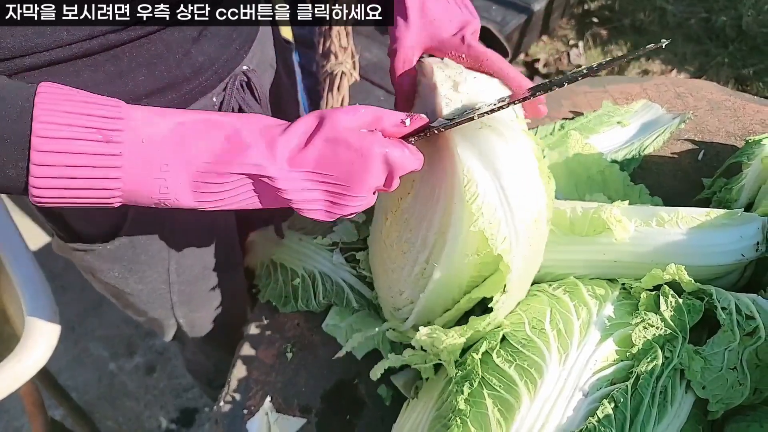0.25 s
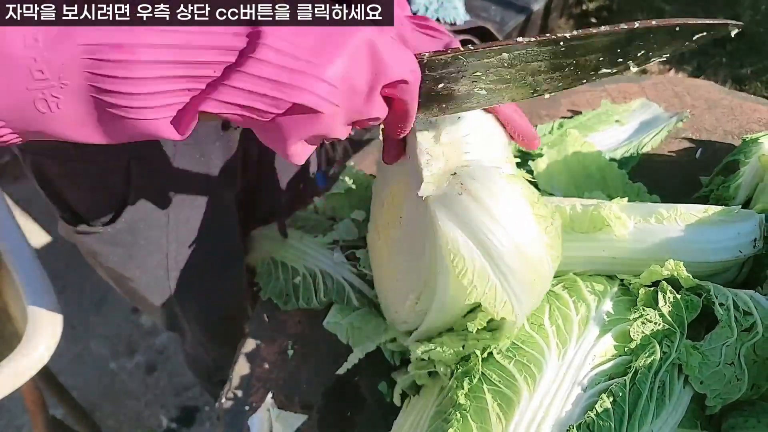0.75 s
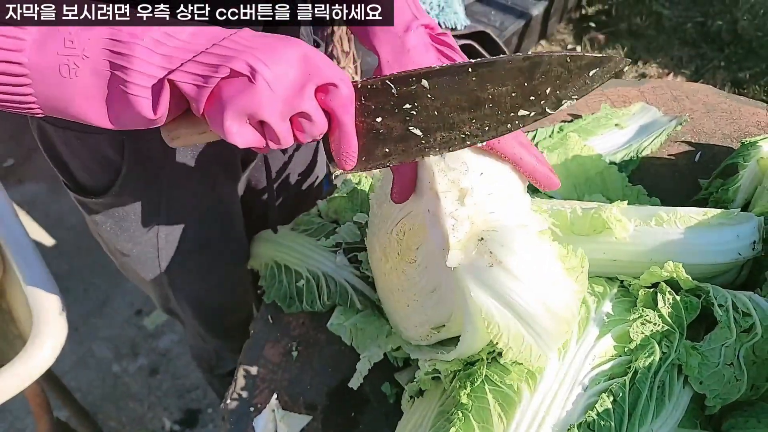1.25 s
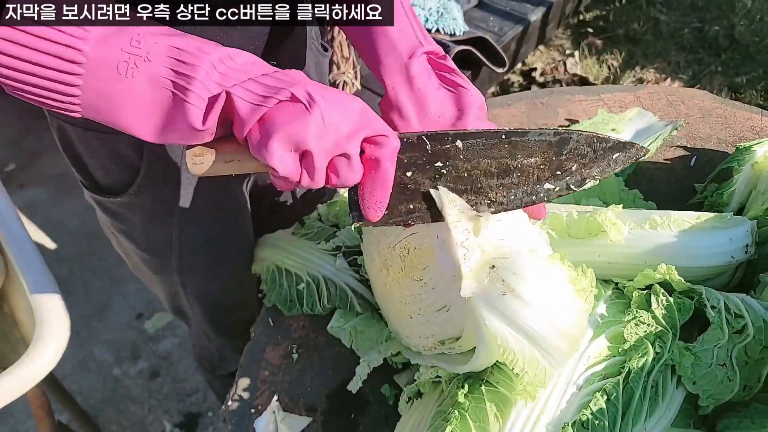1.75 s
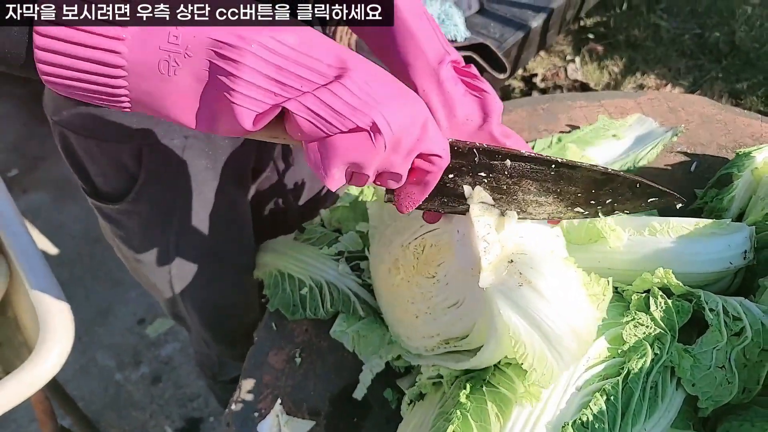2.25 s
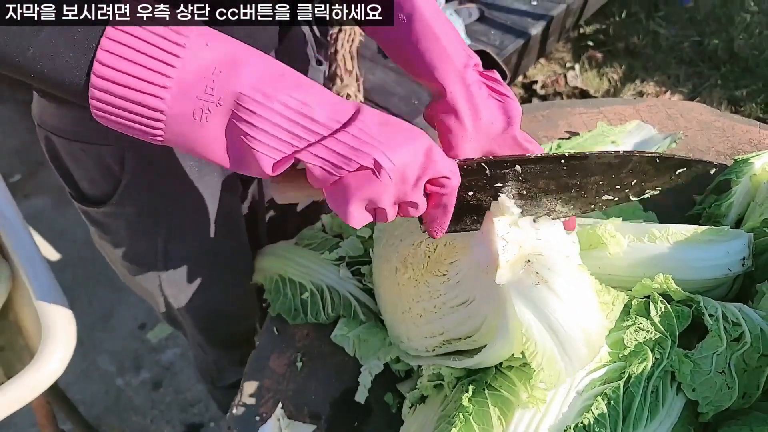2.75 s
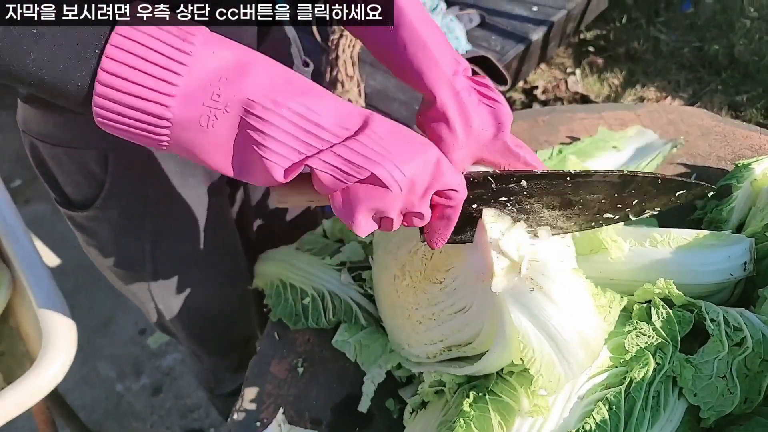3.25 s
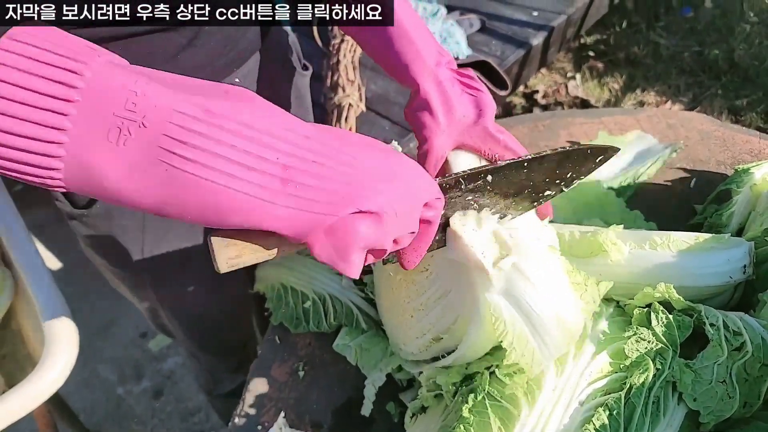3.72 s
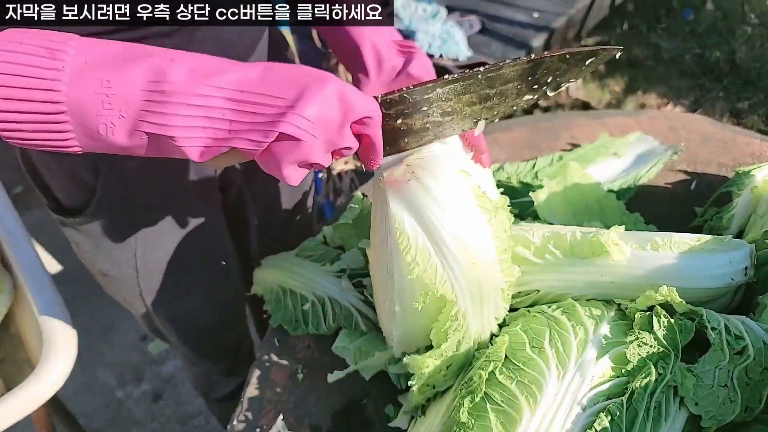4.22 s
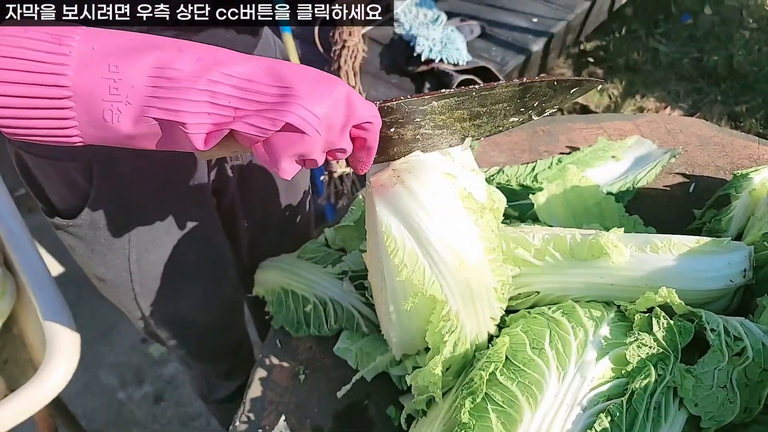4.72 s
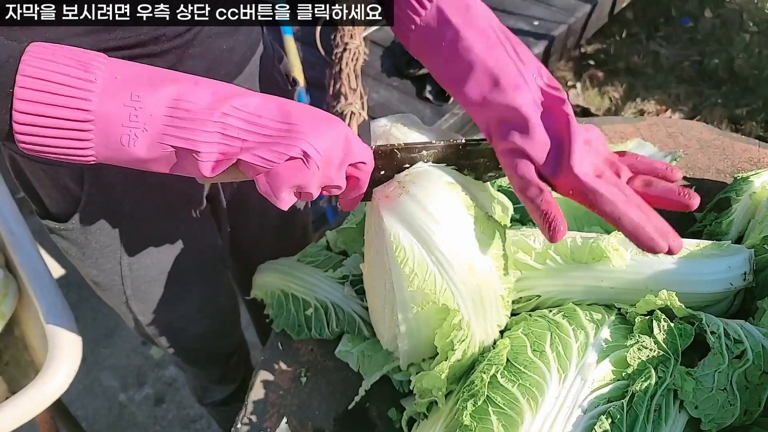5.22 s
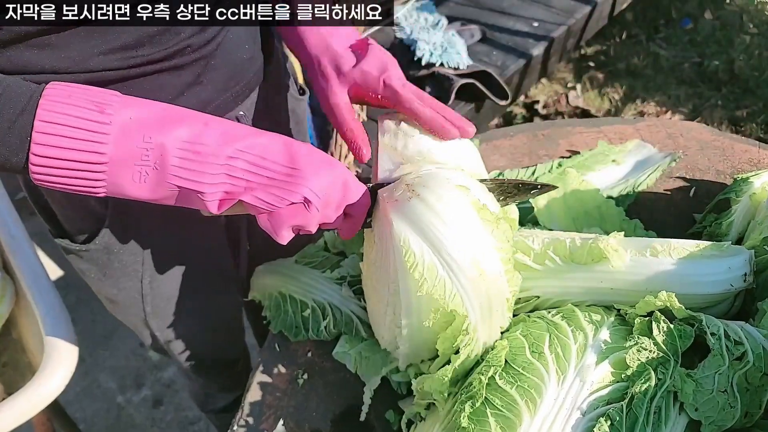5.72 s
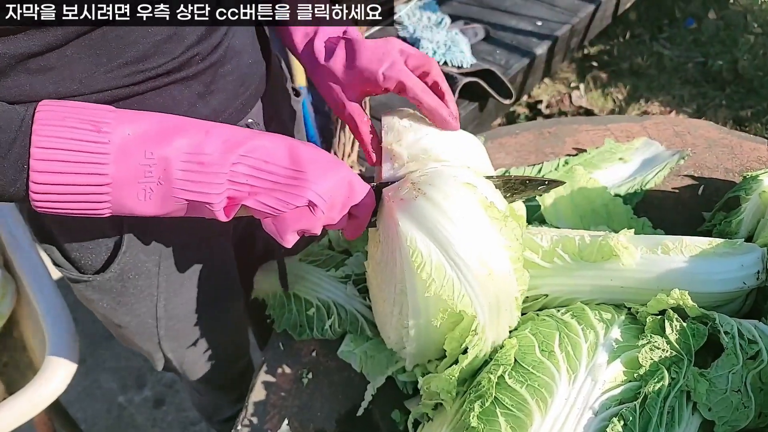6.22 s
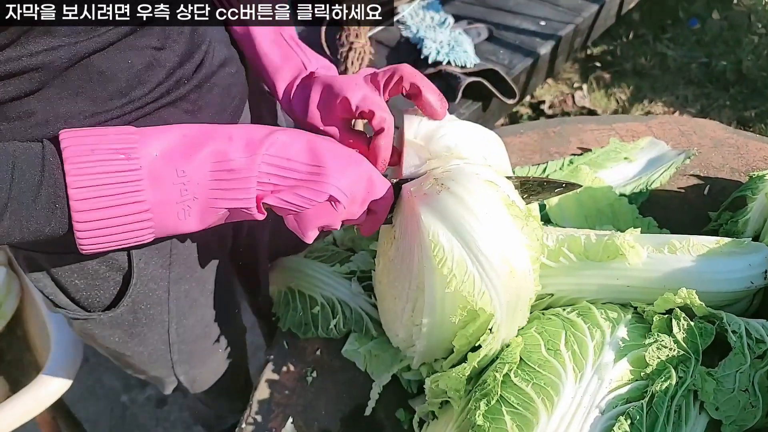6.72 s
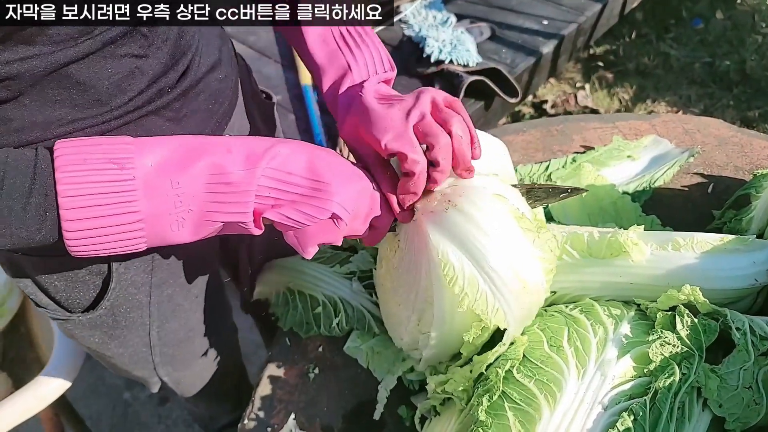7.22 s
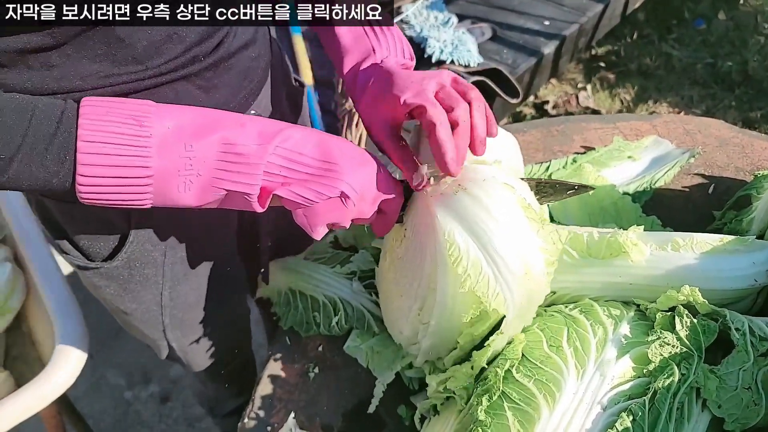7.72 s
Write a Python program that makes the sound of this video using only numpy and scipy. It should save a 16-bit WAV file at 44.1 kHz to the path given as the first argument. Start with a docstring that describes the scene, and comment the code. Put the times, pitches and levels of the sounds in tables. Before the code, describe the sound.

Sharp vegetable snaps and juicy crunching as a blade works through cabbage, with dull tub thumps, low wind buffeting and a faint distant bird.

```python
"""Cutting a cabbage outdoors

Close by, a knife works through a crisp head: ribs snap, leaf cells crunch under blade and gloves,
damp pops slip between them, and dull blows thump the tub below, one of them heavy.
Gusts buffet the microphone; a faint hiss and a small whistling bird sit far behind.
Tissue, wind and hiss are shaped noise; tub, head and pops ring as resonances; the bird is gliding sines."""
import sys
import numpy as np
from scipy import signal
from scipy.fft import rfft, irfft
from scipy.io import wavfile
from scipy.ndimage import uniform_filter1d

SR = 44100
rng = np.random.default_rng(int(sys.argv[2]) if len(sys.argv) > 2 else 0)


def dump_mix(stems):
    """Bounce the given channels to the path in sys.argv[1] as a 16-bit WAV at rate SR."""
    frames = np.atleast_2d(stems).T  # one column per channel
    limited = np.clip(frames, -1, 1)  # hard clip at full scale
    pcm = np.round(limited * 32767).astype(np.int16)
    wavfile.write(sys.argv[1], SR, pcm)


N = 351168


def from_db(db):
    """Amplitude ratio of a level in dB."""
    return 10 ** (np.asarray(db) / 20)


def rms_one(x):
    """Scale a signal to rms 1."""
    return x / np.sqrt(np.mean(x ** 2) + 1e-20)


def in_time(rows):
    """Draw straight lines between the rows; the first column is time in seconds."""
    s, *columns = np.transpose(rows)
    return [np.interp(np.arange(N) / SR, s, column) for column in columns]


def drift(rate_hz):
    """Slow chance: noise through a double one-pole low-pass, spread 1."""
    r = np.exp(-2 * np.pi * rate_hz / SR)
    noise = rng.standard_normal(N + SR)
    return rms_one(signal.lfilter([1], [1, -2 * r, r * r], noise)[SR:])   # settled after a second


def coloured(x, spectrum):
    """Causal (minimum-phase) filter with the given spectrum; white of rms 1 stays at rms 1."""
    hz, db = np.transpose(spectrum)
    grid = np.fft.rfftfreq(8192, 1 / SR)
    cepstrum = irfft(np.log(from_db(np.interp(np.log(grid + 1), np.log(hz), db))))
    # folding the cepstrum onto positive time makes the phase minimal
    cepstrum[1:4096] *= 2
    cepstrum[4097:] = 0
    kernel = irfft(np.exp(rfft(cepstrum)))
    return signal.fftconvolve(x, kernel / np.sqrt(np.sum(kernel ** 2)))[:len(x)]


def resonance(x, hz, width_hz):
    """A damped mode that passes a band around its own pitch."""
    r = np.exp(-np.pi * width_hz / SR)
    gain = (1 - r * r) / 2
    return signal.lfilter([gain, 0, -gain], [1, -2 * r * np.cos(2 * np.pi * hz / SR), r * r], x + 1e-18)


def burst(age, t60):
    """Envelope that dies away by 60 dB in t60."""
    return from_db(-60 * age / t60)


def ring(clicks, hz, t60):
    """A unit click sets a sine of height 1 ringing."""
    r, w = from_db(-60 / (t60 * SR)), 2 * np.pi * hz / SR
    return signal.lfilter([0, np.sin(w)], [1, -2 * r * np.cos(w), r * r], clicks + 1e-18)


def puffs(per_s, spread_db, hold):
    """Clicks of uneven size in clumps, each shrinking by the factor hold per sample; rms 1."""
    sizes = from_db(spread_db * np.minimum(rng.exponential(1, N), 4.5))
    born = rng.random(N) < per_s * from_db(3.0 * drift(45)) / SR
    return rms_one(signal.lfilter([1], [1, -hold], born * sizes))


EDGE_DB, ROUNDNESS = 22.5, 0.87   # a rise or fall spans EDGE_DB; ROUNDNESS bends its slope


def swells(rows, bed):
    """Each row (peak s, rise s, hold s, fall s, dB, second dB) swells over a bed of two levels; powers add."""
    t = np.arange(N // 32 + 2) * 32 / SR   # every 32nd sample is enough
    power = 0
    for s, rise, hold, fall, level_db, second_db in rows:
        away = np.maximum((s - t) / rise, 0) + np.maximum((t - s - hold) / fall, 0)
        levels_db = level_db + np.array([[0], [second_db]])   # the second is relative to the first
        power = power + from_db(levels_db - EDGE_DB * away ** ROUNDNESS) ** 2
    return [np.sqrt(np.interp(np.arange(N) / SR, t, p) + from_db(db) ** 2) for p, db in zip(power, bed)]


# Hiss far behind the cabbage. Each row: frequency in Hz, relative level in dB per Hz.
HISS_COLOUR = [(59, 18), (100, 11), (304, -23), (1030, -18), (2120, 22), (2990, -32), (7170, 4), (7980, -9),
               (11000, -39), (12500, -47), (15500, -60), (16500, -81)]
HISS_DB = -74


def far_hiss():
    """Steady coloured noise whose level drifts slightly."""
    return from_db(HISS_DB + 0.74 * drift(2.1)) * coloured(rng.standard_normal(N), HISS_COLOUR)


POP_PER_S, POP_CYCLES = 160, 23   # mean rate before clumping; cycles until 60 dB down


def small_pops():
    """Random clumped pops that ring a few cycles, pitches spread over two octaves; rms 1."""
    sizes = from_db(5.2 * np.minimum(rng.exponential(1, N), 4)) * rng.choice([-1, 1], N)
    born = rng.random(N) < POP_PER_S * from_db(5.0 * drift(15)) / SR
    dealt = rng.integers(0, 12, N)   # which of twelve pitches each pop takes
    pitches = np.geomspace(650, 3200, num=12)
    return rms_one(sum(ring(sizes * born * (dealt == k), hz, POP_CYCLES / hz) for k, hz in enumerate(pitches)))


# Bouts of leaf tissue tearing under blade or glove, close by. Each row: peak in seconds, rise in seconds,
# fall in seconds, fine crunch in dB, juicy low crunch in dB relative to the fine.
TEARS = [(0.0, .02, 0.13, -45, -0.5), (0.092, 0.086, 0.04, -47.5, -3), (0.157, 0.0097, 0.0098, -46.5, 3),
         (0.285, 0.16, 0.23, -42.5, -3), (0.651, 0.42, 0.5, -47.5, -18), (0.74, 0.046, 0.2, -68, 19),
         (0.858, 0.037, 0.17, -50.5, 7), (0.94, 0.008, 0.062, -45, 1.5), (1.08, 0.13, 0.13, -52.5, -0.5),
         (1.203, 0.048, 0.028, -54.5, 6.5), (1.345, 0.12, 0.033, -41, -4.5), (1.599, 0.08, 0.04, -32, -11),
         (1.748, 0.045, 0.06, -31.5, -19), (1.949, 0.44, 0.19, -44.5, 0), (2.156, 0.11, 0.25, -40, -4.5),
         (2.387, 0.058, 0.063, -37.5, -6.5), (2.518, 0.093, 0.12, -46, -27),
         (2.61, 0.0069, 0.17, -39.5, -21), (2.776, 0.16, 0.031, -45.5, -8),
         (2.868, 0.11, 0.067, -44.5, -5.5), (3.045, 0.19, 0.041, -42, -4), (3.177, 0.19, 0.11, -48.5, -7),
         (3.43, 0.05, 0.17, -38.5, -5), (3.498, 0.065, 0.2, -38, -14), (3.789, 0.15, 0.13, -46.5, 0.5),
         (3.917, 0.058, 0.016, -49, -20), (3.956, 0.011, 0.042, -46, -8), (4.201, 0.01, 0.018, -38, -6),
         (4.309, 0.079, 0.11, -44, -3.5), (4.528, 0.026, 0.11, -54.5, -1), (5.46, 0.028, 0.087, -57, 0),
         (5.659, 0.13, 0.064, -48.5, 3), (5.785, 0.052, 0.048, -49.5, 4.5),
         (5.843, 0.011, 0.023, -48.5, 6.5), (6.29, 0.041, 0.05, -51, 9.5), (6.466, 0.0072, 0.036, -39, -1),
         (6.781, 0.021, 0.067, -61, 10.5), (6.871, 0.027, 0.041, -48.5, 1), (6.952, 0.051, 0.13, -50, -3),
         (7.064, 0.13, 0.091, -51.5, 3), (7.265, 0.065, 0.052, -55.5, 6.5), (7.369, 0.054, 0.13, -45, 0),
         (7.445, 0.02, 0.087, -42.5, -5), (7.9, 0.019, 0.42, -43.5, 1.5), (7.95, 0.054, 0.078, -37, 0)]
# The blade forced through the thick stalk, a crunch that holds. Each row: start of the hold in seconds,
# hold in seconds, fall in seconds, fine crunch in dB, juicy crunch in dB relative to the fine.
CUTS = [(4.711, 0.021, 0.082, -34, 1), (5.034, 0.063, 0.034, -32, -1.5)]
# Faint rustle of leaves being handled. Each row: time in seconds, fine level in dB, juicy level in dB.
RUSTLE = [(0.0, -68, -60), (0.8, -81, -49.5), (1.1, -103, -73), (1.45, -48.5, -50), (1.7, -88, -61),
          (2.7, -62, -49.5), (2.93, -95, -67.5), (3.35, -52.5, -53.5), (4.0, -64.5, -57.5), (4.6, -79, -67),
          (4.9, -66, -58.5), (5.3, -62, -53), (5.75, -71.5, -59.5), (6.4, -65.5, -59.5), (6.7, -68.5, -54),
          (7.3, -69, -54), (7.55, -57, -50.5), (7.83, -55.5, -48.5)]
# Colour of fine crunch as the microphone hears it: the peak near 12 kHz and the dip near 8 kHz come from the
# microphone. # Shared in part by the rib cracks. Each row: frequency in Hz, relative dB per Hz.
FINE_COLOUR = [(1470, -27), (2500, 0), (3500, -8), (4800, -2), (5600, -4), (6400, -9), (7200, -6),
               (8100, -14), (10000, -9), (11300, -7), (12150, 0.5), (13200, -5), (15800, -8)]
# Colour of the wet, low crunch. Each row: frequency in Hz, relative level in dB per Hz.
JUICY_COLOUR = [(150, -55.5), (250, -11), (341, -3), (444, -1.5), (646, -6.5), (972, -3), (1320, -4.5),
                (3500, -16.5), (4550, -22.5), (7700, -120)]
CUT_RISE_S = 0.0075
CUT_DENSE = 1.3   # in a cut so many cells burst at once that they merge into a steadier hiss
SMALL_POPS_DB = -8   # relative to the juicy crunch


def crunch():
    """Big cells burst across the whole range, small ones only in their own band, over fine rubbing noise."""
    bouts = [(s, rise, 0, *rest) for s, rise, *rest in TEARS]
    bouts += [(s, CUT_RISE_S, *rest) for s, *rest in CUTS]
    fine_gain, juicy_gain = swells(bouts, in_time(RUSTLE))
    t = np.arange(N) / SR
    cutting = sum((t > s - CUT_RISE_S) & (t < s + hold + fall) for s, hold, fall, *_ in CUTS)
    thinning = 1 + CUT_DENSE * cutting
    big = puffs(220, spread_db=6.5, hold=0.995) / thinning + 0.5 * cutting
    fine = 0
    for low_hz, high_hz in [(1500, 4200), (4200, 7500), (7500, 11000), (11000, 18000)]:
        small = puffs(360, spread_db=2.5, hold=0.9)
        band = signal.butter(2, [low_hz, high_hz], "band", fs=SR, output="sos")
        fine = fine + signal.sosfilt(band, (big + 1.22 * small + 1.0) * rng.standard_normal(N))
    wet = 1.25 * puffs(220, spread_db=4.0, hold=0.94) / thinning
    juicy = (big + wet + 4.5) * rng.standard_normal(N)
    fine = rms_one(coloured(fine, FINE_COLOUR))
    juicy = rms_one(coloured(juicy, JUICY_COLOUR)) + from_db(SMALL_POPS_DB) * small_pops()
    return fine_gain * fine + juicy_gain * juicy


# Gusts on the microphone. Each row: peak in seconds, rise in seconds, fall in seconds, rumble in dB,
# flutter in dB relative to the rumble.
GUSTS = [(0.109, 0.096, 0.029, -15, -26), (0.231, 0.36, 0.0086, -31, -32),
         (0.318, 0.091, 0.015, -32.5, -32), (0.41, 0.094, 0.045, -31.5, -4.5),
         (0.485, 0.21, 0.074, -31, -19), (0.74, 0.15, 0.24, -41, -4), (0.82, 0.12, 0.19, -34.5, -12.5),
         (0.91, 0.079, 0.069, -25.5, -19), (1.091, 0.035, 0.046, -27.5, -27),
         (1.18, 0.091, 0.94, -43.5, -14.5), (1.6, 0.043, 0.16, -37.5, -1), (1.762, 0.035, 0.041, -23.5, -2),
         (1.812, 0.076, 0.019, -12.5, -19), (1.882, 0.074, 0.0091, -25, -20), (1.95, 0.045, 0.089, -37, -8),
         (2.04, 0.1, 0.27, -29, -15), (2.135, 0.078, 0.056, -18.5, -20), (2.21, 0.056, 0.12, -30, -31),
         (2.37, 0.037, 0.074, -33.5, -12.5), (2.518, 0.024, 0.025, -29, -29),
         (2.63, .05, 0.067, -41.5, -22), (2.72, 0.13, 0.061, -52.5, 9), (3.354, 0.017, 0.017, -20.5, -19.5),
         (3.415, 0.24, .05, -33, -18), (3.447, 0.0062, 0.013, -10.5, -9), (3.51, 0.11, 0.039, -18.5, -26),
         (3.58, 0.1, 0.042, -28, -30), (3.626, 0.03, 0.036, -22.5, -18), (3.78, 0.33, 0.23, -34.5, -12.5),
         (3.87, 0.067, 0.1, -33, -15), (3.965, 0.029, 0.12, -31, -14), (4.05, 0.09, 0.15, -35, -15),
         (4.382, 0.065, 0.028, -27, -33), (4.71, 0.037, 0.15, -42, -7), (4.87, 0.15, 0.32, -37.5, -33),
         (5.11, 0.15, 0.017, -31, -21), (5.29, 0.34, 0.1, -31.5, -11.5), (5.491, 0.046, 0.16, -17, -10),
         (5.826, 0.15, 0.03, -27.5, -16), (5.895, 0.11, 0.16, -24.5, -23),
         (5.988, 0.032, 0.049, -25, -19.5), (6.188, 0.08, 0.025, -33, -16), (6.83, 0.44, 0.035, -39.5, -14),
         (7.38, 0.062, 0.045, -31.5, -18), (7.47, 0.12, 0.046, -42, -4), (7.56, 0.033, 0.035, -33, -25),
         (7.67, 0.076, 0.084, -39, -17), (7.95, 0.77, .2, -37, -13.5)]
# Light breeze between the gusts. Each row: time in seconds, rumble in dB before its lumps are added.
BREEZE = [(0.0, -45), (2.8, -54.5), (2.95, -50.5), (3.22, -47.5), (3.28, -68), (4.2, -48.5), (4.6, -43),
          (4.68, -47), (6.25, -52), (6.6, -45.5), (7.2, -46.5), (7.32, -48), (7.96, -66)]
# Colour of the slow pressure swings. Each row: frequency in Hz, relative level in dB per Hz.
RUMBLE_COLOUR = [(12, -55), (25, 3), (43, 8.5), (59, 6), (91, -2), (125, -4.5), (160, -17), (210, -67.5),
                 (350, -120)]
# Colour of the faster flutter. Each row: frequency in Hz, relative level in dB per Hz.
FLUTTER_COLOUR = [(60, -28), (125, -4.5), (220, -10), (350, -18), (900, -54)]
BREEZE_FLUTTER_DB = -11.5   # relative to the breeze's rumble


def gusts():
    """Turbulence at the microphone port: slow pressure swings, with lumpy faster flutter above them."""
    breeze_db = in_time(BREEZE)[0] + 5.0 * drift(10) - 1.5   # the breeze arrives in lumps
    rows = [(s, rise, 0, *rest) for s, rise, *rest in GUSTS]
    rumble_gain, flutter_gain = swells(rows, [breeze_db, breeze_db + BREEZE_FLUTTER_DB])
    rumble = coloured(rng.standard_normal(N), RUMBLE_COLOUR)
    flutter = coloured(rng.standard_normal(N) * from_db(5.5 * drift(40)), FLUTTER_COLOUR)
    # evened out over 50 ms, so that each gust swings as hard as it blows
    rumble /= uniform_filter1d(rumble ** 2, size=2200) ** .5
    flutter /= uniform_filter1d(flutter ** 2, size=2200) ** .5
    return rumble_gain * rms_one(rumble) + flutter_gain * rms_one(flutter)


# Ribs breaking close by. Each row: start in seconds, relative level of the crack in dB, body ring in dB
# relative to it, decay t60 of the crack in ms (kept within 2 to 40).
SNAPS = [(0.329, -32, 4.5, 3.6), (0.349, -25.5, -12, 6.9), (0.4381, -35, -4, 11), (0.647, -27.5, -3, 7.8),
         (1.088, -31.5, -16, 6), (1.337, -24, -5, 11), (1.3842, -27.5, -9.5, 35), (1.5782, -17.5, -28, 6.2),
         (1.5853, -17, -27, 11), (1.603, -35.5, 2, 38), (1.6254, -16.5, -7.5, 4.8),
         (1.7273, -20, -13.5, 6.4), (1.7461, -23, -4, 26), (1.8037, -20.5, -39, 16),
         (1.9435, -8, -3.5, 3.9), (1.991, -4.5, -7, 4.4), (2.0421, -29, -5, 18), (2.1399, -26.5, -2, 11),
         (2.155, -21, -16, 6.7), (2.1742, -20, -10, 16), (2.182, -25, -5, 6.8), (2.208, -20.5, -9.5, 15),
         (2.227, -29, -32, 5.4), (2.347, -27.5, -9, 9.2), (2.3775, -7.5, -2.5, 4.4), (2.3994, -23, -13, 16),
         (2.4214, -19, -28, 11), (2.5953, -21, -30, 15), (2.624, -23, -10, 4.9), (2.61, -30, -30, 4.4),
         (2.77, -21.5, -0.5, 8.3), (2.7835, -28, -21, 7), (2.851, -24.5, -28, 7.8),
         (2.8645, -32.5, -19.5, 4.9), (2.958, -13.5, -23, 8.9), (2.986, -17, -21, 11),
         (2.993, -23, -18, 5.5), (3.0279, -16, -9.5, 6.2), (3.0579, -25, -11.5, 32), (3.1332, -31, -17, 17),
         (3.3147, -19.5, -17.5, 9.4), (3.3646, -25, -16, 4.7), (3.3886, -21.5, -15, 8.2),
         (3.401, -23, -30, 11), (3.4216, -14.5, -24, 8.4), (3.4302, -10.5, -12.5, 12),
         (3.4351, -6.5, -10, 11), (3.4541, -14, -14, 5.4), (3.4577, -19, -17, 13), (3.4913, -21.5, -7, 31),
         (3.754, -36, -25, 8), (3.835, -28.5, -13, 12), (3.857, -39, -24, 8.4), (3.883, -33, -8.5, 11),
         (3.8947, -34, -17, 9), (3.924, -36, -25, 7), (3.9848, -31, -26, 8), (4.3023, -31, -2, 7.6),
         (4.372, -36, -4, 7), (4.4042, -40, -23, 6.4), (4.522, -30.5, -9.5, 27), (4.7333, -18, -16, 6.8),
         (4.736, -17, -5, 34), (5.0341, -30, -6, 2.5), (5.043, -9, -18, 3.3), (5.062, -13.5, -1.5, 7.4),
         (5.4735, -27, 9.5, 2.3), (6.4702, -13, -14.5, 15), (6.4749, -23, 3.5, 5.6), (6.615, -44, -20, 4.1),
         (6.7732, -33.5, -20, 17), (7.011, -32, -23, 8.5), (7.035, -22.5, -10.5, 19), (7.062, -29, -34, 13),
         (7.068, -24.5, -30, 8.1), (7.4308, -25, -30, 17), (7.4476, -27, -4, 56)]
# Resonances of the cabbage body. Each row: frequency in Hz, width in Hz, relative level in dB.
HEAD = [(404, 168, -2.5), (736, 137, -5), (1110, 1140, 0.5), (2280, 480, -11)]
SPLIT = 4.9   # the first instant of a crack is its sharpest
KICK, KICK_LAG_S, SHIVER = 3.5, 0.0001, 0.26   # the break kicks the head once, then shakes it unevenly
SNAP_COLOUR = 0.35   # a rib's crack is less coloured than the crunch: share of the colour's dB
HEAD_CUT_HZ = 2700   # wet tissue passes little higher


def snaps():
    """Each break is a brief noise crack that also sets the damp head ringing a little longer."""
    crack, thrust = np.zeros((2, N))
    age = np.arange(2000) / SR
    signs = rng.choice([-1, 1], (len(SNAPS), 2, 2000))
    for (s, peak_db, body_db, t60_ms), (crack_noise, shake_noise) in zip(SNAPS, signs):
        at, t60 = round(s * SR), np.clip(t60_ms, 2, 40) / 1000
        push = from_db(peak_db + body_db)
        crack[at:at + 2000] += from_db(peak_db) * burst(age, t60) * crack_noise
        thrust[at:at + 2000] += push * burst(age, 5.4 * t60) * SHIVER * shake_noise
        crack[at] *= SPLIT
        thrust[at + round(KICK_LAG_S * SR)] += KICK * push
    body = sum(from_db(db) * resonance(thrust, hz, width) for hz, width, db in HEAD)
    body = signal.sosfilt(signal.butter(6, HEAD_CUT_HZ, fs=SR, output="sos"), body)
    crack = coloured(crack, [(hz, SNAP_COLOUR * db) for hz, db in FINE_COLOUR])
    return from_db(-8.0) * crack + from_db(12.0) * body


# Damp pops with a pitch, glove rubber slipping on leaf. Each row: start in seconds, frequency in Hz,
# peak in dB, decay t60 in ms.
POPS = [(0.734, 333, -33, 45), (0.911, 345, -36, 56), (1.002, 6900, -39, 4.3), (1.021, 5800, -41, 6.4),
        (1.032, 5500, -38, 5.2), (1.05, 5900, -40, 4.2), (1.064, 5600, -40, 5.8), (1.103, 5500, -45, 6),
        (1.172, 5600, -42, 6), (3.788, 1990, -25.5, 3.8), (6.762, 2020, -51, 14), (6.819, 1290, -39, 31),
        (6.858, 2480, -38, 10), (7.11, 4800, -44, 8), (7.246, 1460, -42, 14), (7.252, 1750, -34, 9),
        (7.258, 1120, -42, 16), (7.267, 2840, -37, 12)]


def pops():
    """The louder pops, each a short decaying sine at its own pitch."""
    out, age = np.zeros(N), np.arange(2000) / SR
    for s, hz, peak_db, t60_ms in POPS:
        pop = burst(age, t60_ms / 1000) * np.sin(2 * np.pi * hz * age)
        out[round(s * SR):][:2000] += from_db(peak_db) * pop
    return out


# Dull blows on the tub below. Each row: start in seconds, relative level in dB, longest decay t60 in
# seconds, contact hardness as a cut in Hz (kept within 600 to 9000), wall rattle in dB.
BLOWS = [(0.855, -41.5, 0.16, 648, -34), (2.662, -35, 0.1, 800, -31), (3.221, -55, 0.023, 2490, -29.5),
         (3.4364, -29, 0.045, 620, -20), (3.983, -33, 0.16, 820, -61), (3.994, -33, 0.1, 690, -23.5),
         (5.4734, -15.5, 0.39, 4930, -20), (5.498, -26, 0.21, 1470, -23), (7.929, -27, 0.054, 600, -39)]
# Modes of the tub. Each row: frequency in Hz, relative level in dB, decay t60 in seconds if not cut short.
TUB = [(122, -1.5, .28), (236, -5, .17), (369, -8, .3), (420, -13, .2), (508, -6, .17), (591, -10, .15),
       (668, -9, .12), (727, -11, .12), (824, -14, .1), (1040, -15, .12), (1500, -15, .1), (1930, -1, .035)]
# Colour of the tub walls shaking. Each row: frequency in Hz, relative level in dB per Hz.
RATTLE_COLOUR = [(80, 1), (180, 2.5), (300, -1), (600, -6), (1000, -13.5), (2000, -11), (4000, -25.5),
                 (8000, -46)]


def blows():
    """A blow rings the tub's modes, damped by the load, and a rattle of its walls dies behind it."""
    out, age = np.zeros(N + SR), np.arange(SR) / SR
    for s, level_db, t60, cut_hz, rattle_db in BLOWS:
        # short blows miss the deep modes, soft ones the high modes
        edges_hz = [18 / t60, np.clip(cut_hz, 600, 9000)]
        contact = signal.butter(3, edges_hz, "band", fs=SR, output="sos")
        rings = 0
        for k, (hz, db, mode_t60) in enumerate(TUB):
            tone = (-1) ** (k + 1) * np.sin(2 * np.pi * hz * age)   # neighbours start in opposite directions
            rings = rings + from_db(db + rng.normal(0, 1)) * burst(age, min(mode_t60, t60)) * tone
        rattle = coloured(rng.standard_normal(SR) * burst(age, t60), RATTLE_COLOUR)
        blow = from_db(level_db) * rings + from_db(rattle_db) * rattle
        out[round(s * SR):][:SR] += signal.sosfilt(contact, blow)
    return out[:N]


# Whistles of a small bird far off. Each row: start in seconds, end in seconds, start pitch in Hz,
# end pitch in Hz, relative level in dB.
WHISTLES = [(5.27, 5.33, 3650, 3400, -62), (5.7, 5.75, 3600, 4000, -70), (5.96, 6.02, 4300, 4050, -72),
            (6.175, 6.25, 3150, 3950, -63), (6.25, 6.36, 3950, 3300, -64), (6.5, 6.56, 3950, 4250, -66),
            (6.65, 6.775, 2700, 4350, -60), (6.775, 6.865, 4300, 3250, -59), (7.2, 7.25, 3200, 3800, -60),
            (7.31, 7.35, 3650, 3600, -64)]
WARBLE_DB, WARBLE_HZ = 2.0, 95   # unsteadiness of a far whistle in level and pitch


def bird():
    """Short gliding sines, unsteady in level and pitch."""
    out = np.zeros(N)
    level_waver, pitch_waver = drift(30), drift(80)
    for start, end, from_hz, to_hz, level_db in WHISTLES:
        at, count = round(start * SR), round((end - start) * SR)
        pitch_hz = np.linspace(from_hz, to_hz, count) + WARBLE_HZ * pitch_waver[at:][:count]
        tone = np.sin(2 * np.pi * np.cumsum(pitch_hz) / SR)
        out[at:][:count] += from_db(level_db) * signal.windows.tukey(count, .2) * tone
    return out * from_db(WARBLE_DB * level_waver - 3)


def scene():
    """All sources summed, dry, in one channel."""
    return (far_hiss() + crunch() + gusts() + snaps() + pops() + blows() + bird())[None]


def record(dry):
    """The microphone drops the deepest rumble; the top falls away above 15.75 kHz and is then cut."""
    bass = signal.butter(4, 38, "high", fs=SR, output="sos")
    fade = signal.ellip(7, .5, 26, 15750, fs=SR, output="sos")
    cut = signal.cheby2(14, 75, 16900, fs=SR, output="sos")
    return signal.sosfilt(np.vstack([bass, fade, cut]), dry)


dry = scene()
out = record(dry)
dump_mix(out)
```